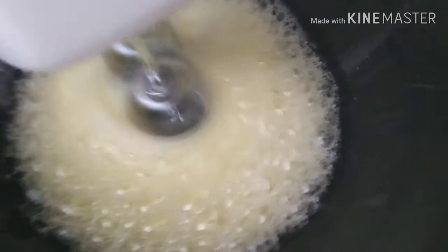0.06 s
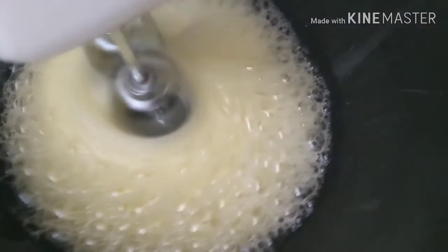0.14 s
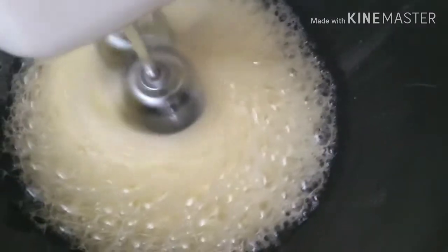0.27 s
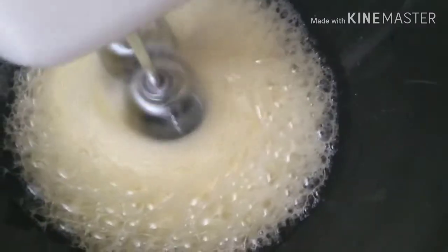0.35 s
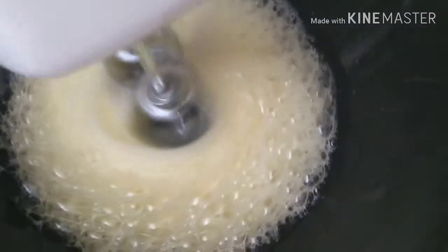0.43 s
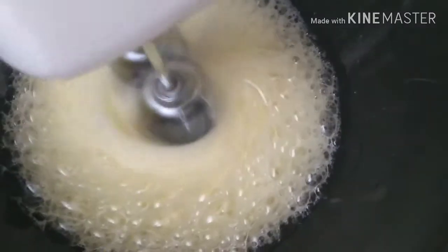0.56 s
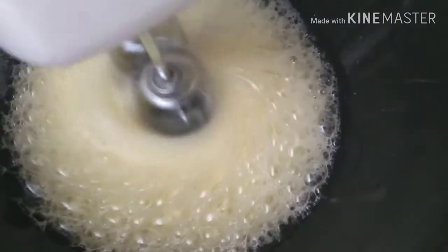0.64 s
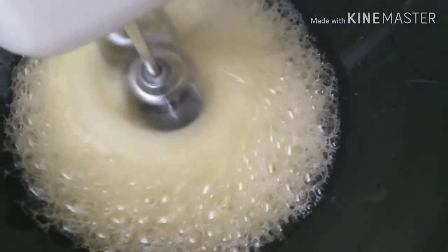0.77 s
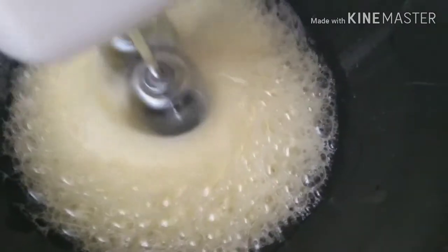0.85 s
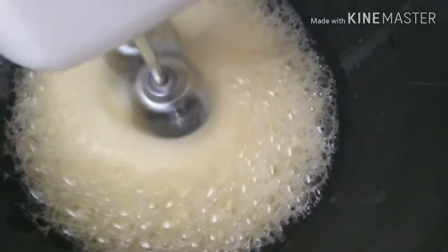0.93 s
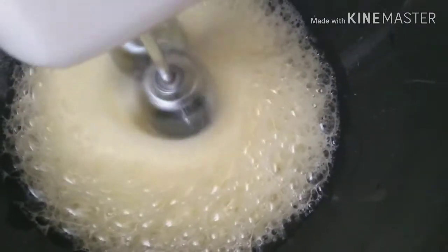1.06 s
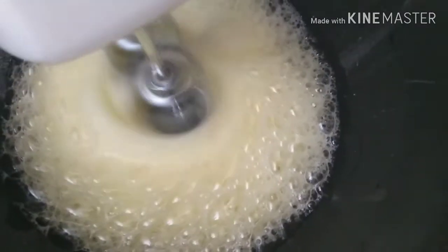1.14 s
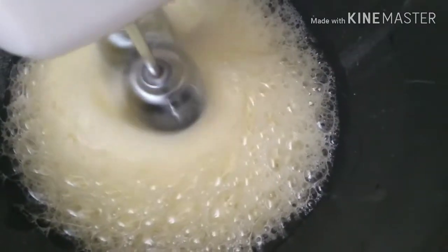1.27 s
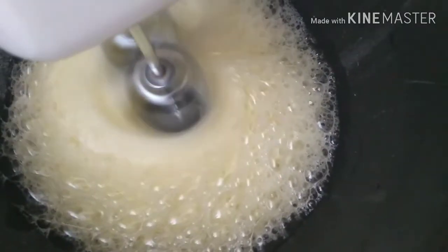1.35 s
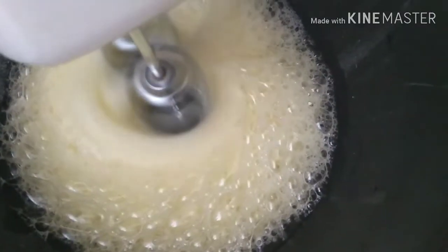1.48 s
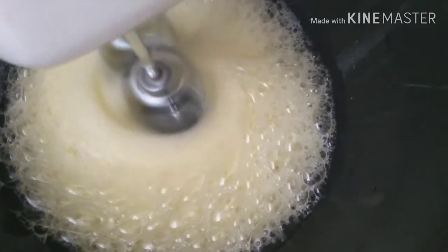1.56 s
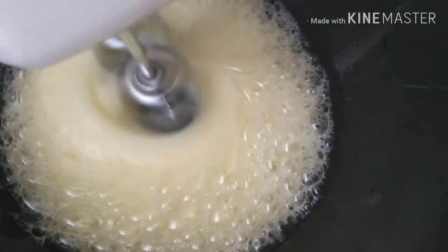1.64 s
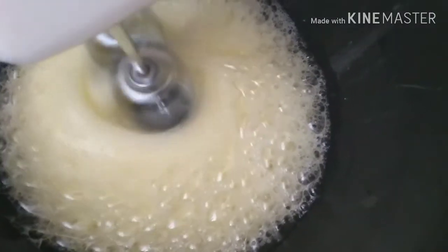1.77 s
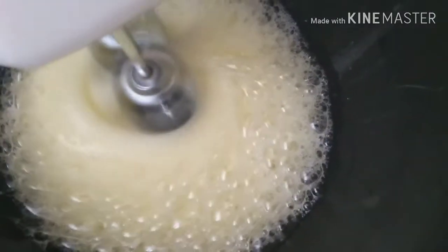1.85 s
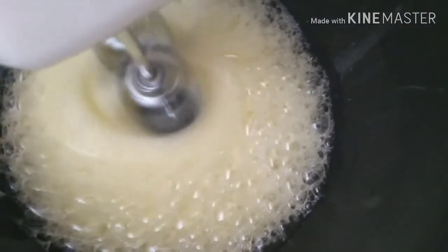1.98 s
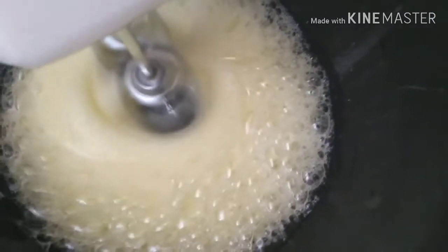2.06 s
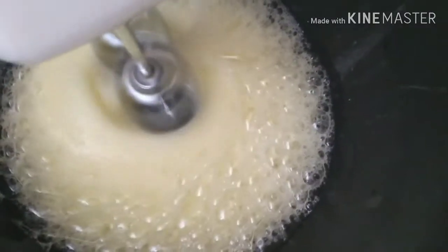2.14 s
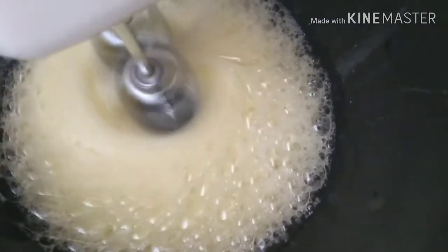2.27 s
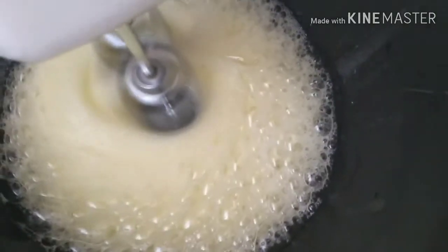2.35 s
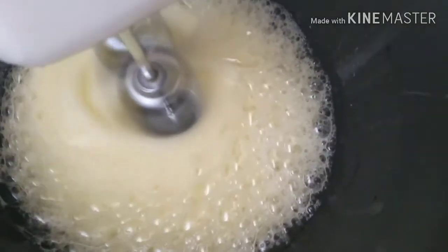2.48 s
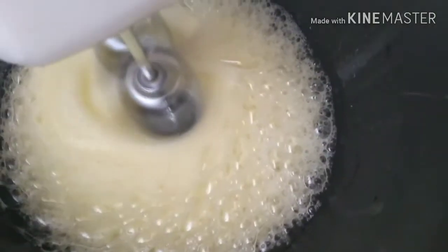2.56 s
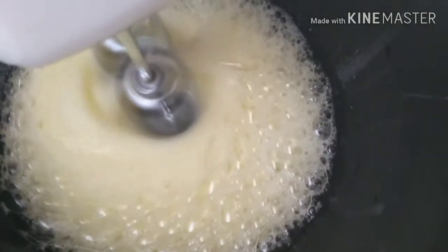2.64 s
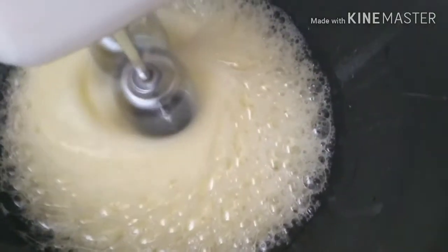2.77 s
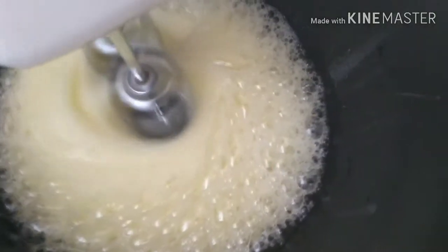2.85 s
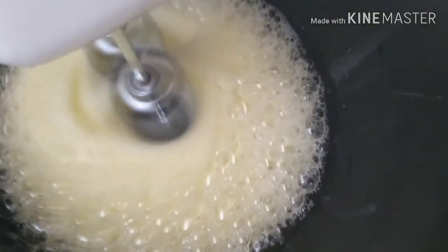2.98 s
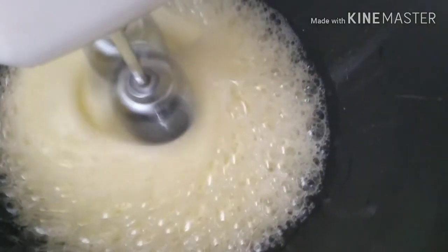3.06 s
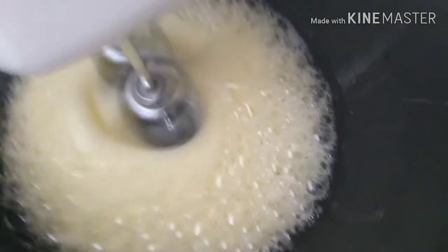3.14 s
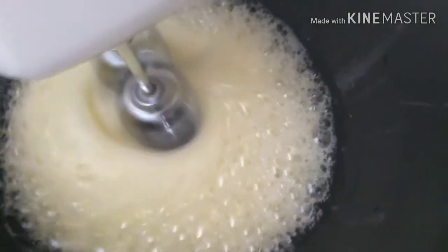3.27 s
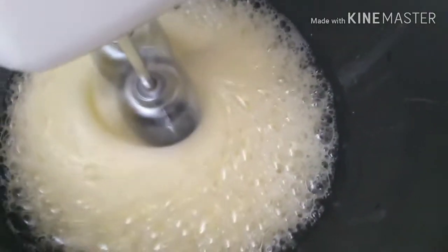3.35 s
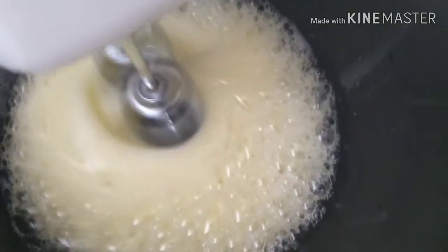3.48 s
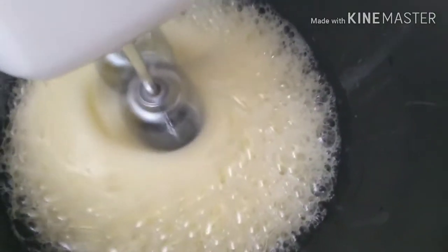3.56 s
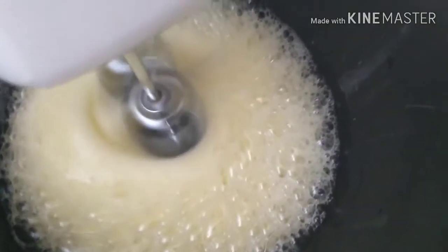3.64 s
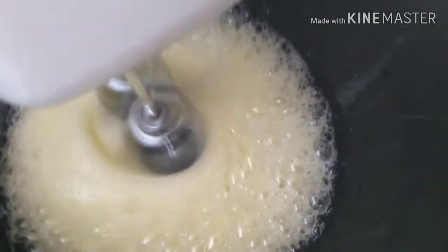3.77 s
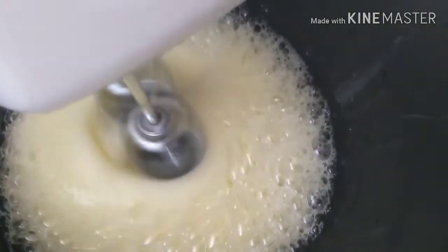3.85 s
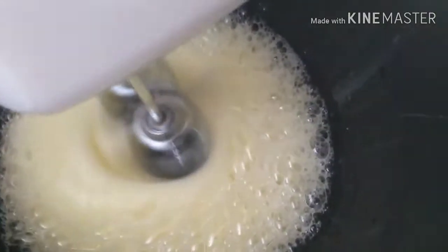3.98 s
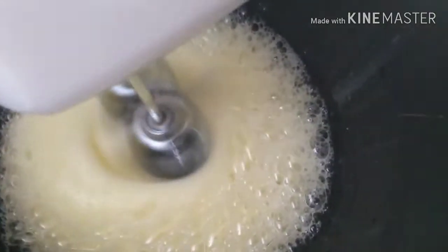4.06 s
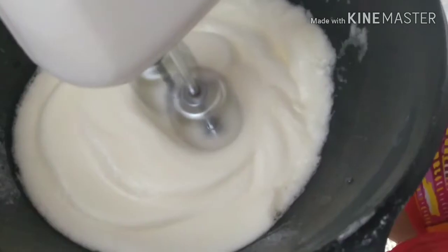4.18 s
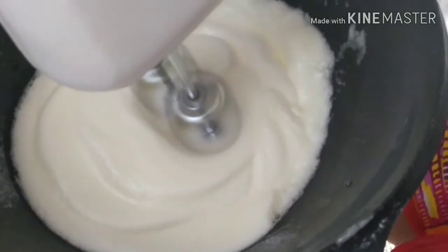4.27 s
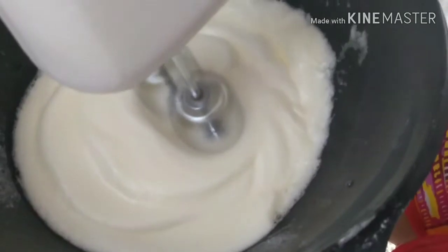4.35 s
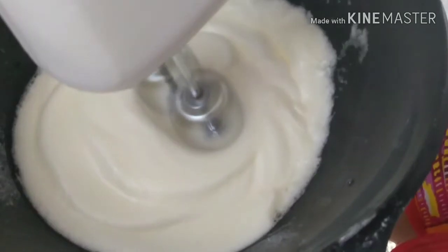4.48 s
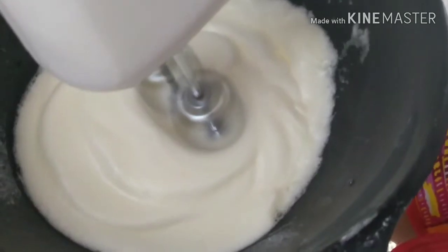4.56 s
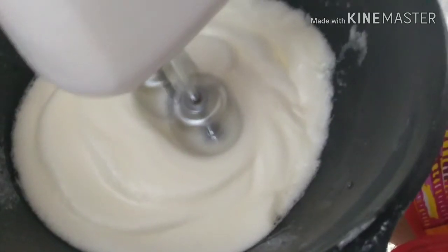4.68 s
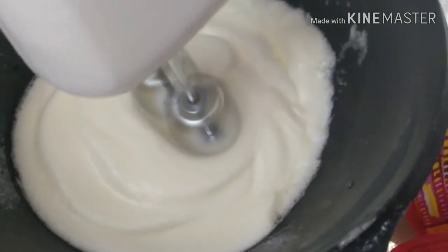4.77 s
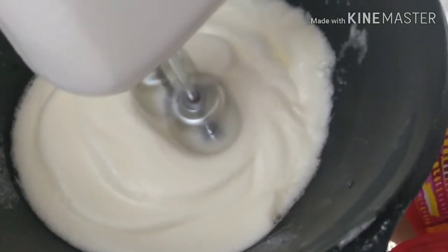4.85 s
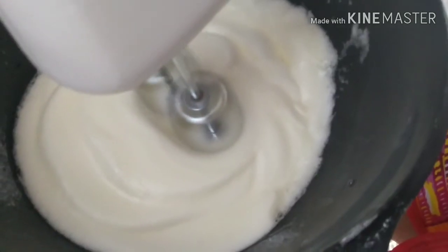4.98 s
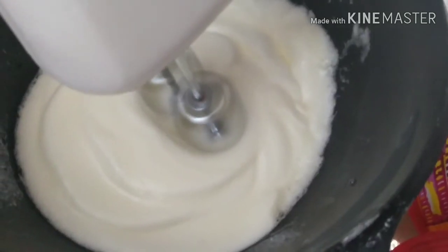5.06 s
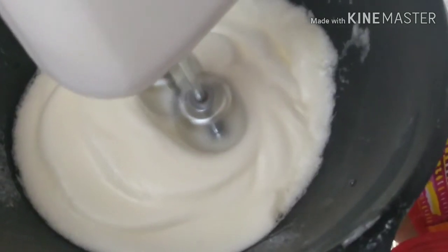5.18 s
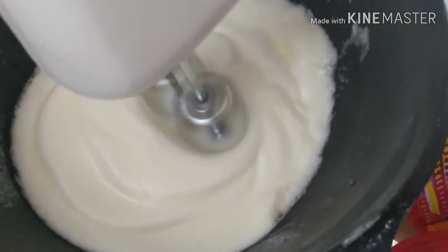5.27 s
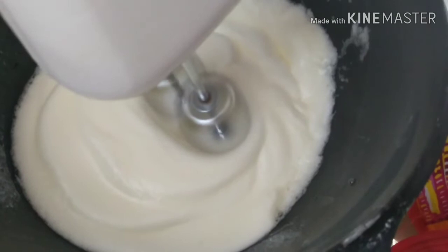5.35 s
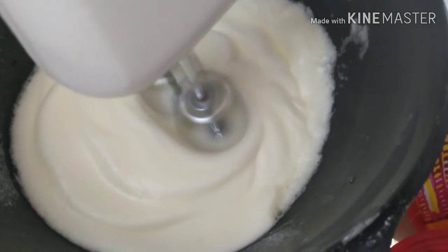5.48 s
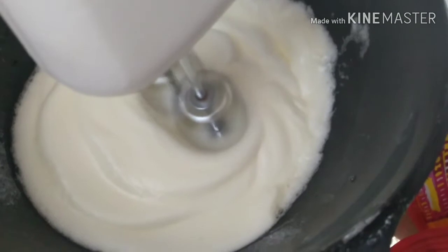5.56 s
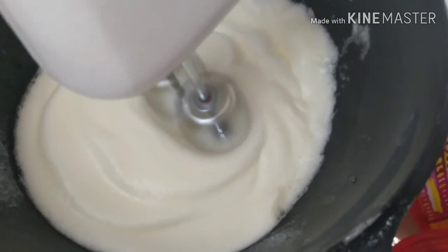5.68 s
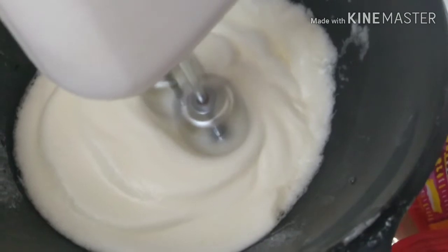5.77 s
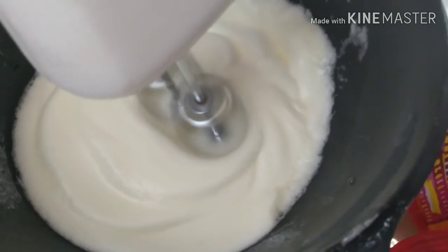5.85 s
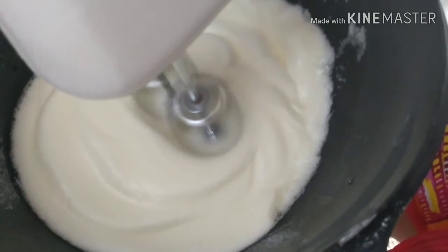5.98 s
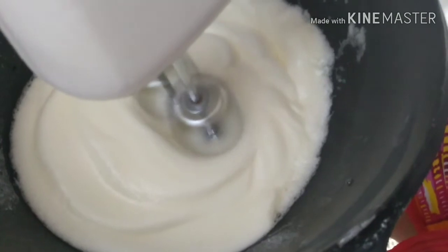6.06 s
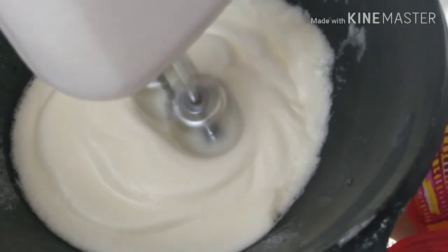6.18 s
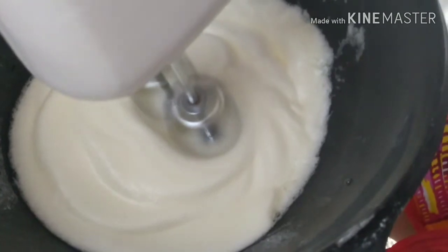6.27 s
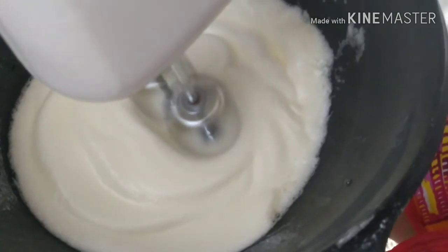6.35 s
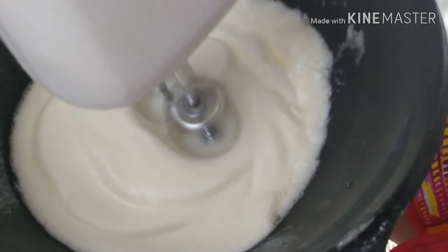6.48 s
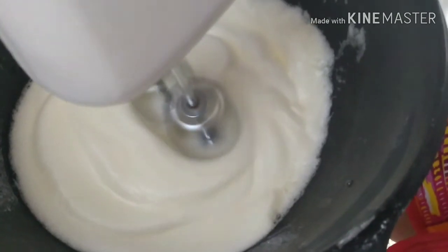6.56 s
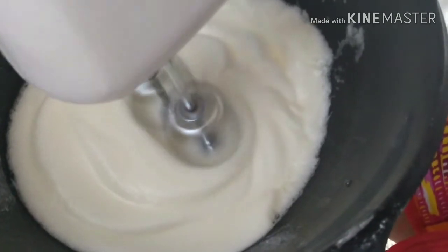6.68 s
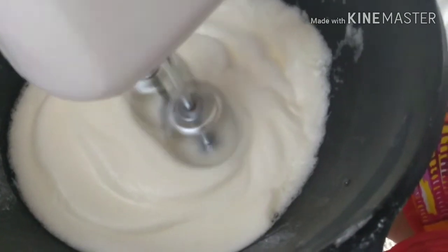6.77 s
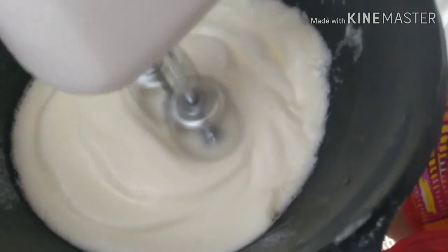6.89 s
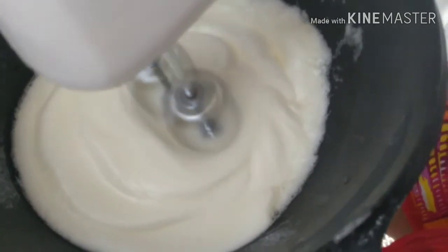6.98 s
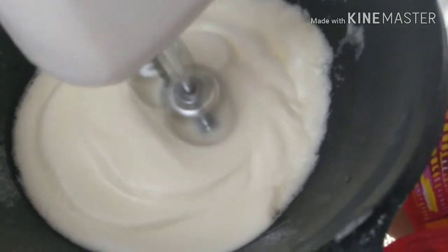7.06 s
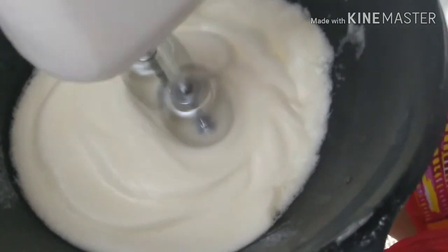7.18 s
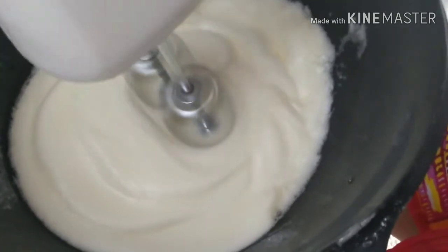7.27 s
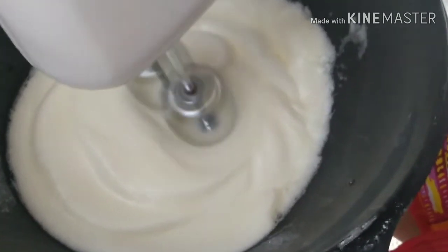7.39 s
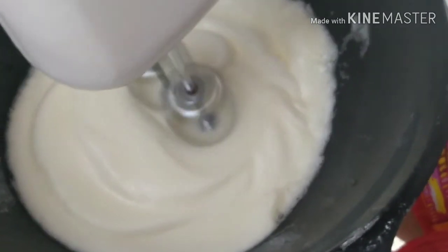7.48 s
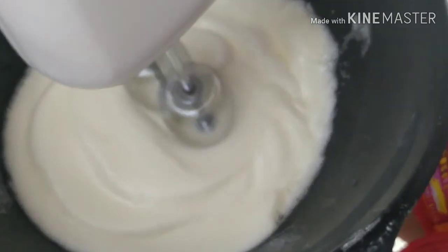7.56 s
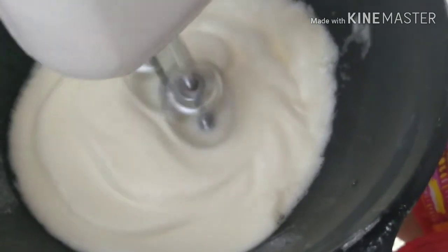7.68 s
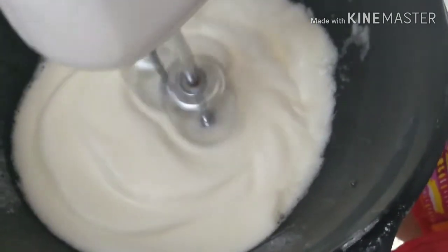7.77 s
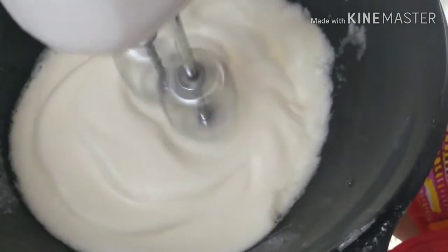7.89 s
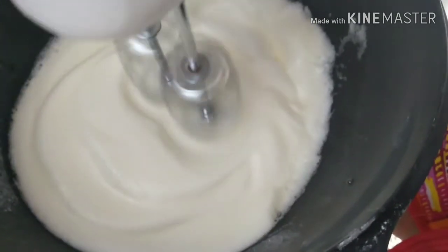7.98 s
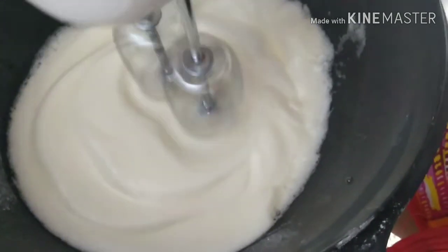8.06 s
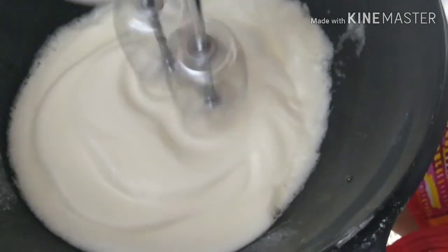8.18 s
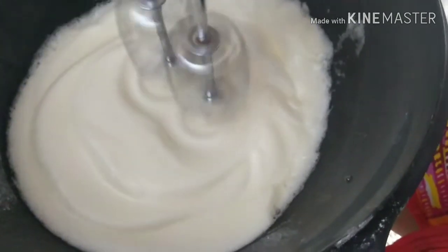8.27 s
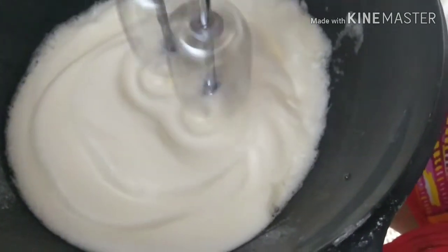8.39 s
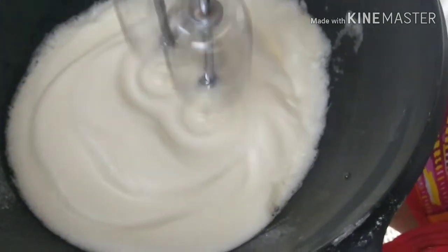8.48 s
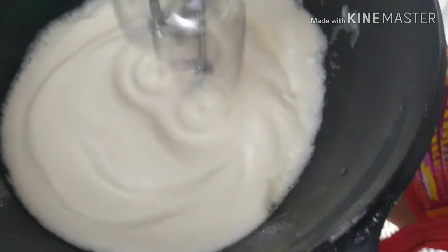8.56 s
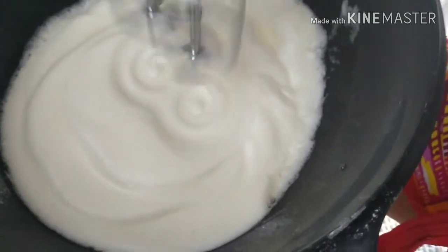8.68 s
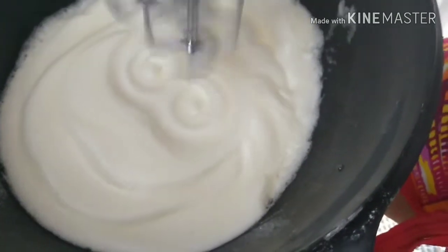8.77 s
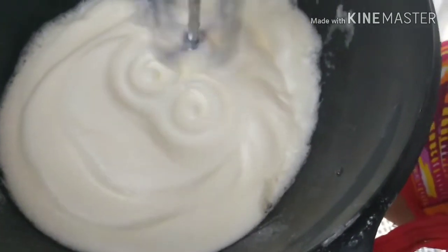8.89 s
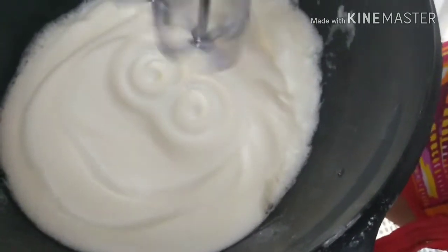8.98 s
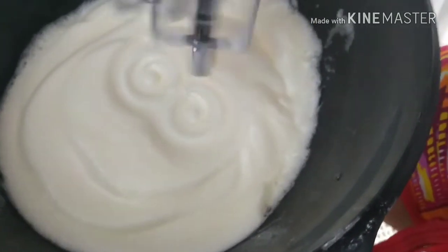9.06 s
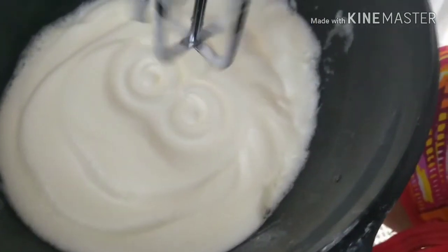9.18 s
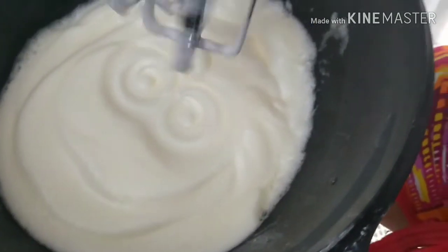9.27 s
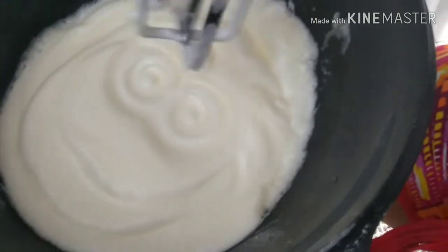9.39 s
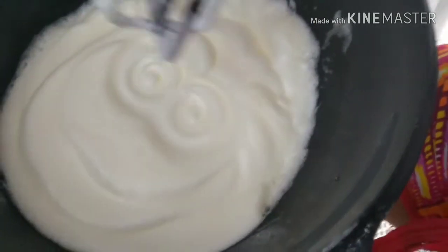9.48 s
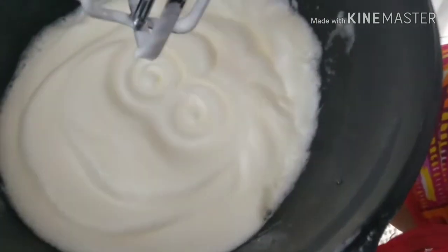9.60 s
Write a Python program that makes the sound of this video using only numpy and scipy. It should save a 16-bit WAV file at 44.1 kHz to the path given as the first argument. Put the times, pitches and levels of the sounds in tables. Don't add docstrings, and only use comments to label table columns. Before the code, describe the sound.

A mixer motor drones at constant speed, its low hum under airy rush and brush hiss, fluttering slightly as the beaters turn in a bowl of foam. After a short silent cut, the harsher second take fades in quickly. Switched off just before seven seconds, it coasts down in a long falling whine with a bump and small bowl ticks, leaving faint kitchen air. The nearby phone microphone sounds hollow and phasey.

```python
import sys
import numpy as np
from scipy import signal
from scipy.fft import rfft, irfft, next_fast_len
from scipy.io import wavfile
from scipy.ndimage import uniform_filter1d, map_coordinates

SR = 44100
rng = np.random.default_rng(int(sys.argv[2]) if len(sys.argv) > 2 else 0)


def how_loud(loudness_db):
    steps = np.asarray(loudness_db, float) / 20
    return 10 ** steps


def unload_audio(sound):
    columns = np.transpose(np.atleast_2d(sound))
    steps = np.round(np.clip(columns, -1, 1) * 32767)
    wavfile.write(sys.argv[1], SR, steps.astype(np.int16))


N = 424683

# [t/s, turns per s]
ROTOR_SPEED = [(0, 371.6), (1.35, 373.1), (2.1, 372.7), (4.1, 374.1), (4.16, 383.6), (5.7, 382.9),
               (6.8, 383.6), (6.92, 381.5), (7, 369), (7.2, 320.2), (7.4, 276.3), (7.6, 239), (7.8, 206.8),
               (8, 178.7), (8.3, 140.7), (8.8, 78.3), (9.05, 49.5), (9.63, 2)]
# [f/Hz, level/dB per Hz]
HOUSING_LOW = [
    [(40, -36), (80, -22.5), (150, -14), (250, -11.5), (330, -1.5), (480, 2), (580, -4.5), (700, -2), (900, -6.5), (1150, -4.5), (1500, -7.5), (1900, -7), (2400, -13), (2900, -8)],
    [(40, -24), (80, -22), (150, -18.5), (250, -18), (330, -4.5), (480, -1.5), (580, -9), (700, -3.5), (900, -5), (1150, 0.5), (1500, -6), (1900, -4), (2400, -11), (2900, -2)],
    [(40, -30), (150, -17.5), (270, -13.5), (390, -2.5), (590, -4), (700, -4.5), (830, -7.5), (990, -5.5), (1120, -6.5), (1280, -1.5), (1550, -12), (1950, -5), (2400, -17), (2900, -13)],
]
# [f/Hz, level/dB per Hz]
HOUSING_HIGH = [
    [(1900, -24), (2400, -5.5), (2900, -14), (3400, -12.5), (3800, -12), (4600, -11), (5500, -18.5), (6800, -14), (7600, -21), (9300, -14), (10500, -17), (12000, -16), (14200, -23)],
    [(1900, -22), (2400, -12.5), (2900, -3.5), (3300, -10.5), (3700, -4), (4200, -12.5), (4700, -11), (5500, -15), (7000, -15), (8000, -17), (9600, -19), (11000, -17.5), (12500, -21.5), (14200, -25)],
    [(2400, -8), (2900, -1.5), (3300, -9), (3650, -5), (4100, -11.5), (4600, -12), (5300, -15), (6800, -14.5), (7400, -15.5), (8000, -15), (9700, -18.5), (10800, -16.5), (12500, -21), (14200, -25)],
]
GEAR_MULTIPLES = [1.953, 2, 2.048, 2.952, 3, 3.048, 4, 5, 6, 7, 8, 9, 11, 12]
# [first view/dB, second view/dB, coasting/dB]
GEAR_LEVELS = [(-6, 6, -9), (1, 0, 13), (-6, 6, -9), (-3, 7, -9), (5, 1, 9), (-3, 5, -9), (-3, 5, 7),
               (2, -3, -2), (-3, -3, 6), (-9, -9, -4), (-9, -9, 2), (-9, -9, 3), (-9, -9, 4), (-9, -9, 6)]
BRUSH_MULTIPLES = [16, 22, 23, 24, 25, 26, 28, 32, 35, 36, 37, 40, 47, 48, 49, 52, 59, 60, 61, 71, 72, 73,
                   76, 84, 96, 108, 120]
# [first view/dB, second view/dB, coasting/dB]
BRUSH_LEVELS = [(13, 14, 13), (4, 3, -3), (0, 6, 0), (11, 7, 14), (0, 6, 3), (-3, -3, 3), (-6, -6, 3),
                (2, 5, 3), (3, 0, 3), (2, 4, 11), (5, 0, 4), (-9, -9, 4), (0, 0, 3), (0, 0, 12), (0, 0, 4),
                (0, 0, 4), (0, 0, 6), (0, 0, 11), (0, 0, 5), (0, 0, 6), (0, 0, 7), (0, 0, 4), (0, 0, 5),
                (0, 0, 4), (0, 0, 4), (0, 0, 3), (0, 0, 3)]
# [t/s, level/dB]
SWELL = [(0, -3), (2.2, -3), (2.6, 12), (4.1, 13)]
# [turns per s, gear level/dB, brush level/dB]
COASTING_CLARITY = [(25, -9, -9), (55, 8, 7), (105, 8, 7), (195, 2, 1), (225, -4, 0), (280, -8, -3),
                    (320, -2, 1), (360, 0, 0)]
# [f/Hz, width/Hz, level/dB]
HOUSING_RINGS = [(375, 70, 4), (460, 70, 4), (570, 120, -1), (710, 50, 6), (965, 70, 8), (1280, 150, 4),
                 (2100, 200, 2), (3600, 600, 6), (5200, 900, 1), (6900, 600, 4), (8200, 900, 5),
                 (11000, 3500, 4)]
# [t/s, level/dB]
HAND_DISTANCE = [(0, -1), (.35, -1), (.7, 0), (1.55, 0), (1.9, 2), (2.15, -.5), (2.7, .5), (3.3, .5),
                 (4.1, -1), (4.2, 0), (5.3, 0), (6.9, 0), (7.3, -0.5), (7.9, 0.5), (8.5, -1.5), (9, 1)]
# [t/s, level/dB, f/Hz]
BOWL_CLINKS = [
    (.596, -20.5, 517),
    (7.18, -28, 2800),
    (7.278, -26, 704),
]
# [f/Hz, depth 0-1]
PORT_COMB = [
    [(100, 0.3), (350, 0.99), (4200, 0.99), (6200, 0.97), (8200, 0.4), (10000, 0), (14000, .3)],
    [(100, 0.87), (350, 0.97), (2200, 1), (4200, 0.81), (6200, 0.74), (7300, 0.2), (8500, 0.52), (14000, .4)],
]
# [f/Hz, phase/rad]
BASS_PHASE = [(60, -0.14), (200, -1.13), (370, -1.09), (700, -0.47), (1050, 0.011)]
# [f/Hz, share 0-1]
PORT_LINK = [(100, 0.84), (350, 1), (1100, 0.93), (1600, .3), (3000, 0.5), (14000, 0)]
# [t/s, level/dB]
HAND_BUMPS = [(0.276, -28), (1.88, -30), (4.21, -14), (4.275, -6.5), (4.315, -19), (4.39, -18), (4.49, -27),
              (4.53, -22), (4.73, -25), (5.09, -24), (5.22, -29), (5.26, -25), (5.969, -29), (6.152, -22),
              (6.65, -27), (6.86, -28), (6.905, -24), (7.226, -5.5)]
# [f/Hz, level/dB per Hz]
ROOM_TONE = [(40, -17), (80, -5), (150, 3.5), (250, -3.5), (330, -1.5), (480, -1), (580, 0.5), (700, -1.5),
             (900, -1), (1150, -3), (1500, -6.5), (1900, -9), (2400, -11.5), (2900, -16.0), (4000, -24),
             (8000, -33), (14000, -46)]
# [f/Hz, depth 0-1]
DIFFUSE_COMB = [(100, 0.8), (2000, 0.94), (14000, .3)]
# [f/Hz, level/dB]
FRIDGE_DRONE = [
    (54, -63),
    (58, -60),
    (112, -56),
]
# [t/s, level/dB]
ROOM_OPENING = [(0, -7), (7.4, -19.5), (7.8, -10), (7.9, 2.5), (9.63, 0)]
# [t/s, depth/dB]
GAIN_DUCKS = [(.09, 1.5), (.54, 3), (.86, 1.5), (1.18, 3), (1.425, 3), (1.775, 4), (1.97, 2.5),
              (2.715, 4.5), (3.05, 2), (3.23, 2.5), (3.5, 1.5), (3.76, 3), (5.1, 1.5), (6.16, 1.5),
              (7.035, 2.5), (7.23, 3)]

GEARING = 21.6
FULL_SPEED, OFF_S = 383.5, 6.9
RUSH_DB, HISS_DB, HUM_DB = (-26, -25.5, -26), (-34, -31.5, -32.5), (-18.5, -20, -19.5)
RUSH_POWER, HISS_POWER, HUM_POWER = 1.47, 1.59, 0.63
MOUNT_HZ = 11.5
RUNOUT_DB, RUNOUT_BELOW = -7, 78
COASTING_FLICKER_DB, DULL_DB = 3, -7
COMB_HZ = 2060
COMB_SHIFT, LEAN = (0.022, 0.17), (0.044, 0.14)
CUT_S, RESIDUE_DB, RESIDUE_S = 4.0888, -42, 0.013
FADE_IN_S, FADE_LENGTH_S, FADE_POWER, EASE_S = 4.176, 0.29, 0.54, 0.014


def unit(x):
    return x / np.sqrt(np.mean(x ** 2) + 1e-20)


def along(points, hz):
    f, v = np.transpose(points)
    return np.interp(np.log(hz + 1), np.log(f + 1), v)


def curves(rows):
    s, *cols = np.transpose(rows)
    return [np.interp(np.arange(N) / SR, s, c) for c in cols]


def wobble(rate):
    knots = rng.standard_normal(int(N * rate / SR) + 4)
    return map_coordinates(knots, [np.arange(N) * rate / SR])


def filtered(x, response):
    m = next_fast_len(N + 8192)
    return irfft(rfft(x, m) * response(np.fft.rfftfreq(m, 1 / SR)), m)[..., :N]


def patchy(depth_db, size):
    z = signal.stft(rng.standard_normal((2, N)), nperseg=512)[2]
    field = uniform_filter1d(rng.standard_normal(z.shape[1:]), size=size, axis=0)
    field = unit(uniform_filter1d(field, size=6, axis=1))
    return unit(signal.istft(z * how_loud(depth_db * field), nperseg=512)[1][:, :N])


def stage():
    return np.searchsorted([4.14 * SR, 7.0 * SR], np.arange(N))


def mixer():
    speed, = curves(ROTOR_SPEED)
    turns = np.cumsum(speed + 0.267 * wobble(12)) / SR
    rush_gain, hiss_gain, hum_gain = strengths(speed)
    mesh = np.cos(2 * np.pi * turns * 2 / GEARING)
    shake = wobble(25)
    pace, *clear = np.transpose(COASTING_CLARITY)
    low_db, high_db = [(stage() == 2) * np.interp(speed, pace, db) for db in clear]
    low = lambda hz: 1 / np.sqrt(1 + (hz / 2400) ** 12)
    high = lambda hz: np.sqrt(1 - low(hz) ** 2)
    rush = rush_gain * housed(gears(speed, turns, mesh, shake, low_db), HOUSING_LOW, low)
    hiss = hiss_gain * housed(brushes(speed, turns, mesh, shake, high_db), HOUSING_HIGH, high)
    return rush + hiss + hum_gain * unbalance(turns, mesh)


def strengths(speed):
    share = np.where(np.arange(N) > OFF_S * SR, np.minimum(speed / FULL_SPEED, 1), 1)
    near, now = how_loud(curves(HAND_DISTANCE)[0]), stage()
    off_mount = 1 / np.sqrt(1 + ((1 - share) * FULL_SPEED / MOUNT_HZ) ** 2)
    rush_gain = near * how_loud(RUSH_DB)[now] * share ** RUSH_POWER
    hiss_gain = near ** 0.35 * how_loud(HISS_DB)[now] * share ** HISS_POWER
    hum_gain = near ** 1.15 * how_loud(HUM_DB)[now] * share ** HUM_POWER * off_mount
    return rush_gain, hiss_gain, hum_gain


def unbalance(turns, mesh):
    beat = np.cos(2 * np.pi * turns / GEARING)
    return how_loud(0.12 * beat + 0.13 * mesh + 0.17 * wobble(18)) * np.sin(2 * np.pi * turns)


def gears(speed, turns, mesh, shake, clear_db):
    noise = how_loud(0.71 * mesh + 0.16 * shake) * patchy(1.34, size=4)
    return noise + whine(GEAR_MULTIPLES, GEAR_LEVELS, speed, turns, gain_db=clear_db, flicker_db=3.5)


def brushes(speed, turns, mesh, shake, clear_db):
    once = np.cos(2 * np.pi * turns)
    noise = how_loud(0.24 * once + 0.33 * mesh + 0.46 * shake) * patchy(1.83, size=2)
    uneven = 1 + 0.15 * (stage() == 2) * once
    tones = uneven * whine(BRUSH_MULTIPLES, BRUSH_LEVELS, speed, turns, gain_db=clear_db, flicker_db=1.0)
    swell = whine(BRUSH_MULTIPLES[4:5], [(3.3, -57, -60)], speed, turns,
                  gain_db=curves(SWELL)[0], flicker_db=4.0)
    return noise + tones + swell + runout(speed, turns)


def whine(multiples, orders, speed, turns, gain_db, flicker_db):
    out, now, step = np.zeros(N), stage(), 64
    depth_db = np.where(now == 2, COASTING_FLICKER_DB, flicker_db)
    for multiple, row in zip(multiples, np.array(orders)):
        ring = np.repeat(singing(multiple * speed[::step]), step)[:N]
        level = np.where(now == 2, ring, 1) * how_loud(row[now] + gain_db + depth_db * wobble(11))
        level = level * (multiple * speed < 15000)
        out += level * np.sin(2 * np.pi * (multiple * turns + rng.random()))
    return np.sqrt(2 * 10 / (SR / 2)) * out


def singing(hz):
    power = how_loud(2 * DULL_DB)
    for ring_hz, width, db in HOUSING_RINGS:
        power = power + how_loud(2 * db) / (1 + (2 * (hz - ring_hz) / width) ** 4)
    return np.sqrt(power)


def runout(speed, turns):
    contour = unit(irfft(rfft(rng.standard_normal(2048))[:110], 2048))
    slow = np.clip(4 * (1 - speed / RUNOUT_BELOW), 0, 1)
    return how_loud(RUNOUT_DB) * slow * np.interp(turns % 1, np.arange(2048) / 2048, contour)


def housed(drive, colours, edge):
    stages = []
    for colour in colours:
        response = lambda hz: how_loud(along(colour, hz)) * edge(hz)
        noise_rms = np.sqrt(np.mean(response(np.linspace(0, SR / 2, num=4000)) ** 2))
        stages.append(filtered(drive, response) / noise_rms)
    return np.choose(stage(), stages)


def clinks():
    t, out = np.arange(SR // 20) / SR, np.zeros(N + SR)
    for s, db, hz in BOWL_CLINKS:
        envelope = how_loud(db + 11.5 - 60 * t / 0.04) * (1 - np.exp(-t / 0.0036))
        out[round(s * SR):][:len(t)] += envelope * np.sin(2 * np.pi * hz * t)
    return out[:N]


def ports(pair):
    first, second = [combed(pair, *angle) for angle in zip(PORT_COMB, COMB_SHIFT, LEAN)]
    return np.where(stage() == 0, first, second)


def combed(pair, depth, shift, lean):
    turn = lambda hz: np.pi - 2 * np.pi * hz / COMB_HZ + along(BASS_PHASE, hz) + shift
    swing = lambda hz: np.clip(along(depth, hz), 0, 1) * np.cos(turn(hz))
    link = lambda hz: np.clip(along(PORT_LINK, hz), 0, 1)
    linked = lambda hz: lean - 1j * np.sign(np.sin(turn(hz))) * link(hz)
    share = lambda hz: np.array([linked(hz), np.sqrt(1 - link(hz) ** 2)])
    mid = filtered(pair[0], lambda hz: np.sqrt((1 + swing(hz)) / 2))
    side = filtered(pair, lambda hz: np.sqrt((1 - swing(hz)) / 2) * share(hz)).sum(axis=0)
    return np.array([mid + side, mid - side])


def bumps():
    t, out = np.arange(SR // 10) / SR, np.zeros(N + SR)
    push = np.sin(np.pi * np.log2(1 + t / 0.0023)) * np.exp(-t / 0.0066)
    for s, db in HAND_BUMPS:
        out[round(s * SR):][:len(t)] += how_loud(db - 5) * push
    late = np.roll(out, 25)
    return np.array([out[:N], -0.7 * late[:N]])


def kitchen():
    colour = lambda hz: how_loud(along(ROOM_TONE, hz)) * hz ** 2 / (hz ** 2 + 45 ** 2)
    air = how_loud(-46) * unit(filtered(patchy(1.5, size=4), colour))
    room = combed(air, DIFFUSE_COMB, shift=0.1, lean=0.1)
    return how_loud(curves(ROOM_OPENING)[0]) * (room + fridge() * [[1.3], [0.4]])


def fridge():
    t, drone = np.arange(N) / SR, np.zeros(N)
    for hz, db in FRIDGE_DRONE:
        drone += how_loud(db + 1.0 + 1.1 * wobble(3.6)) * np.sin(2 * np.pi * hz * t + 0.6 * wobble(3))
    return drone


def scene():
    return ports(mixer() + clinks()) + bumps() + kitchen()


def scene_change():
    t = np.arange(N) / SR
    residue = how_loud(RESIDUE_DB) * np.exp(-((t - CUT_S) / RESIDUE_S) ** 4)
    fade = np.clip((t - FADE_IN_S) / FADE_LENGTH_S, 0, 1) ** FADE_POWER
    fade = fade * np.clip((t - FADE_IN_S) / EASE_S, 0, 1)
    return np.maximum(np.clip((CUT_S - t) / 0.0015, 0, 1), residue + fade)


def low_pass(x):
    return signal.sosfilt(signal.butter(12, 14270, fs=SR, output="sos"), x)


def record(dry):
    t, duck_db = np.arange(N) / SR, np.zeros(N)
    for s, db in GAIN_DUCKS:
        duck_db += db * np.clip((t - s) / 0.0032, 0, 1) * np.exp(-np.abs(t - s) / 0.1)
    mix = dry * how_loud(1.0 - duck_db) * scene_change()
    return low_pass(mix)


dry = scene()
out = record(dry)
unload_audio(out)
```